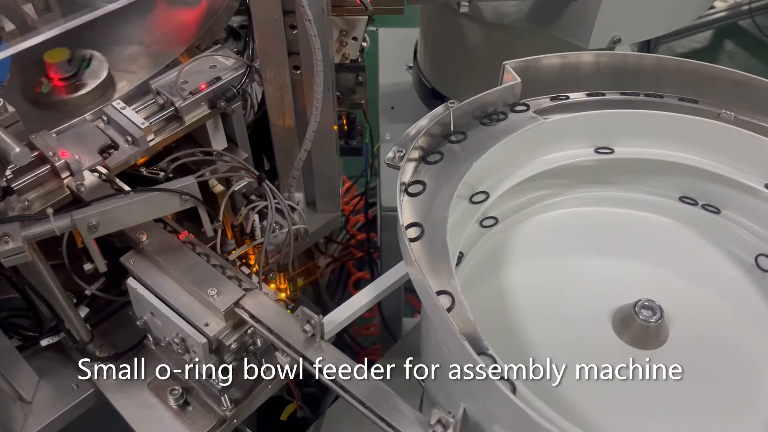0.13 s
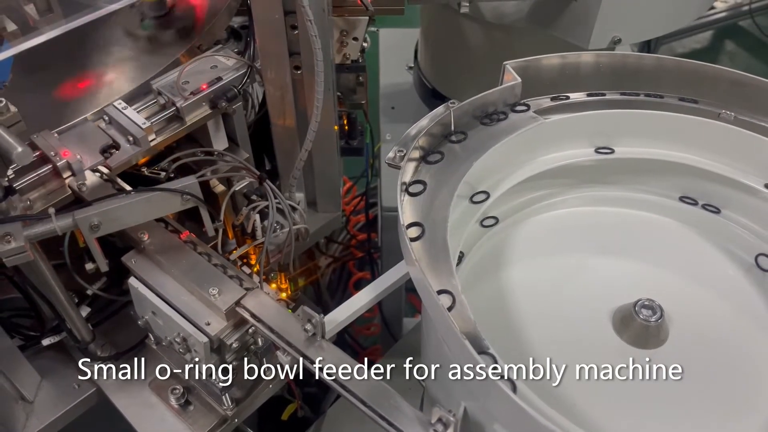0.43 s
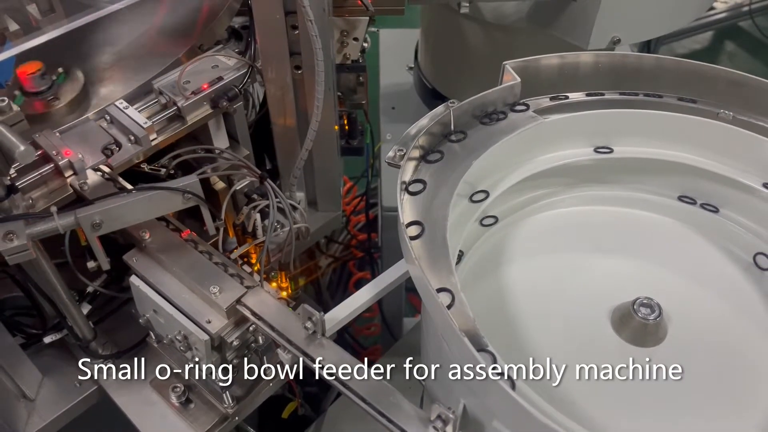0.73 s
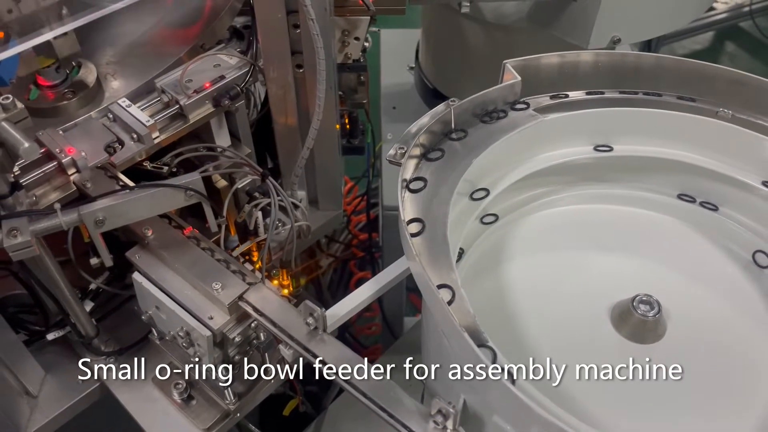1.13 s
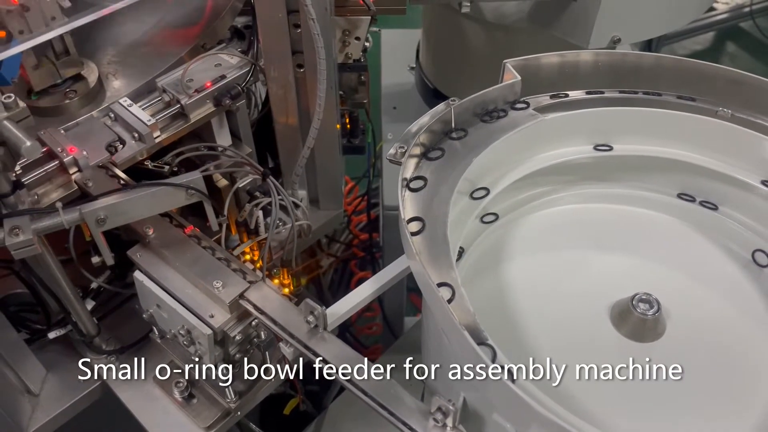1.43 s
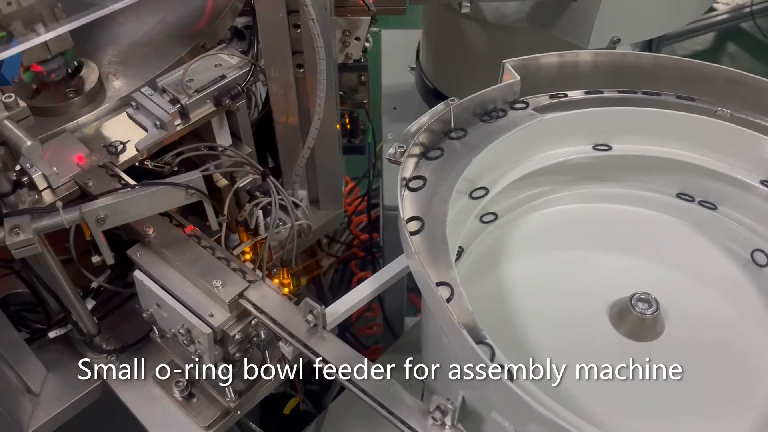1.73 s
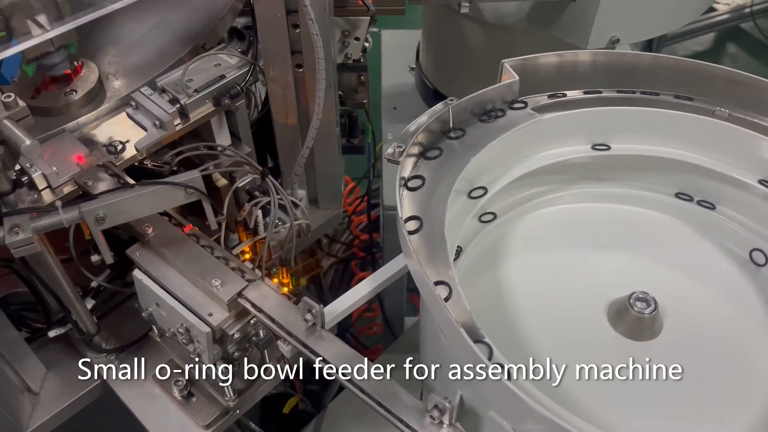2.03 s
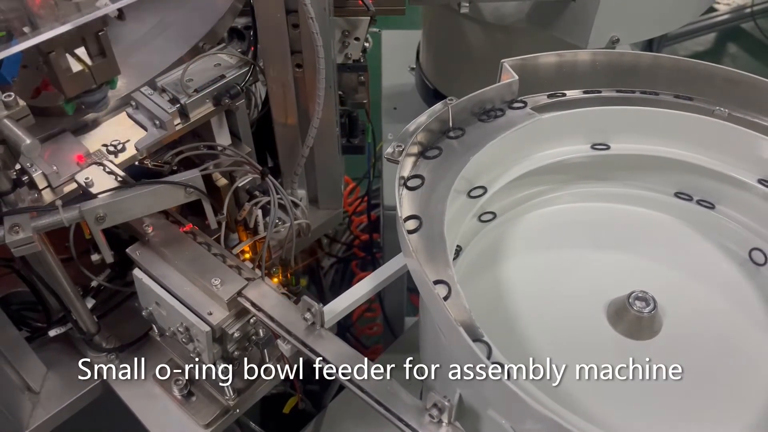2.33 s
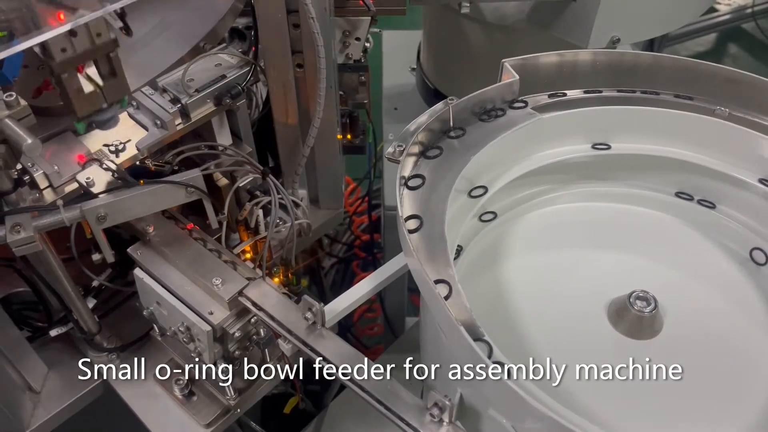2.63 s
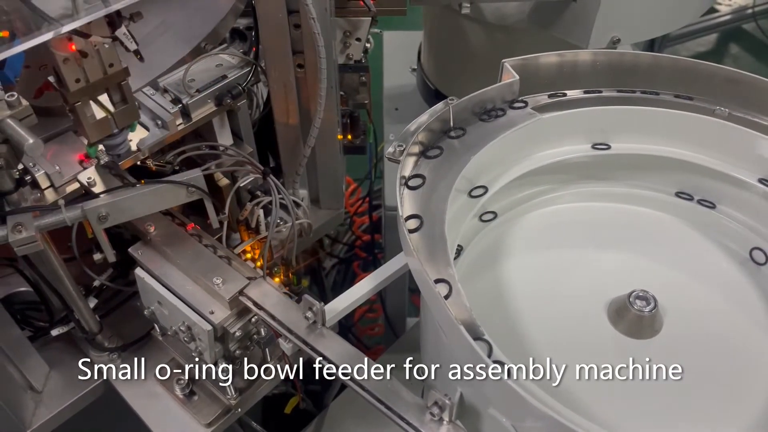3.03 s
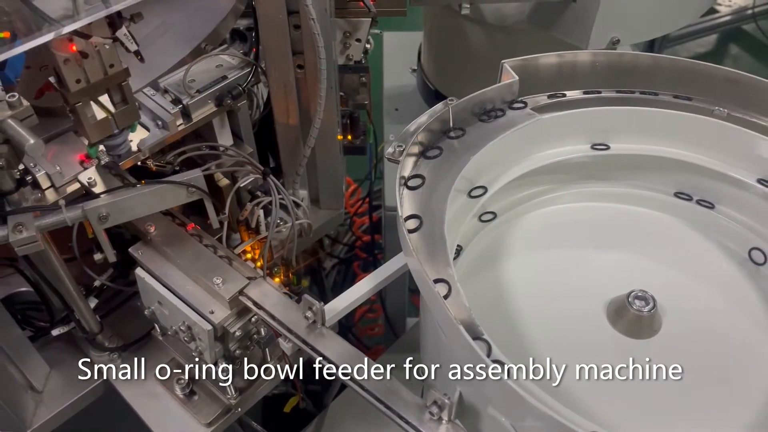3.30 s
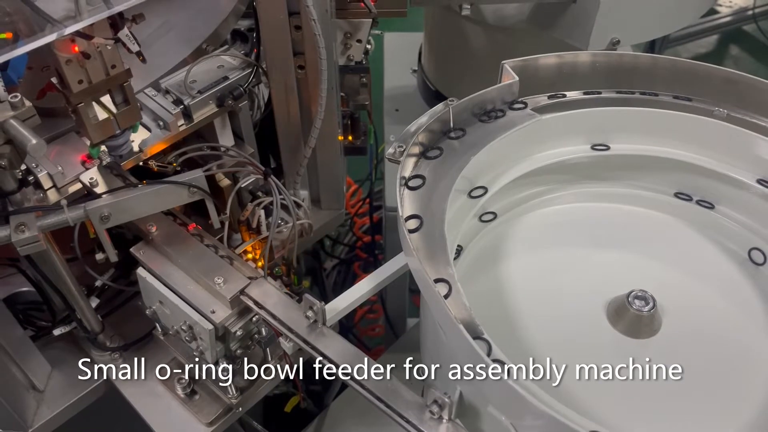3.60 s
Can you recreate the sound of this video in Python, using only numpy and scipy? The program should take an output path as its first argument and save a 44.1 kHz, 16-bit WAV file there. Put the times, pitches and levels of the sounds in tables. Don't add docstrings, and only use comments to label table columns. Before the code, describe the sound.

A loud compressed air blast hisses for two seconds in a factory, after a feeder's hum and rattle and a steel clank; heavy thuds punctuate it, then a softer exhaust hiss. Close stereo microphone.

```python
import sys
import numpy as np
from scipy import signal
from scipy.fft import rfft, irfft, next_fast_len
from scipy.io import wavfile
from scipy.ndimage import uniform_filter1d, map_coordinates

SR = 44100
rng = np.random.default_rng(int(sys.argv[2]) if len(sys.argv) > 2 else 0)


def transcribe(signal):
    frames = np.atleast_2d(signal).T
    limited = np.clip(frames, -1, 1)
    pcm = np.round(limited * 32767).astype(np.int16)
    wavfile.write(sys.argv[1], SR, pcm)


def makeup_ratio(level_db):
    decades = np.asarray(level_db, float) / 20
    return 10 ** decades


N = 165816
T_S = np.arange(N) / SR
STROKE_HZ = 49.3
DIFFUSE = .75

# centre in Hz, width in Hz, gain in dB.
RIM_NOTCH = [(2510, 110, -14)]


def unit(x):
    return x / np.sqrt(np.mean(x ** 2) + 1e-20)


def along(points, hz):
    f, v = np.transpose(points)
    return np.interp(np.log(hz + 1), np.log(f + 1), v)


def curves(rows):
    s, *cols = np.transpose(rows)
    return [np.interp(T_S, s, c) for c in cols]


def wobble(rate_hz):
    return map_coordinates(rng.standard_normal(2000), [T_S * rate_hz])


def filtered(x, response):
    m = next_fast_len(N + 8192)
    return irfft(rfft(x, m) * response(np.fft.rfftfreq(m, 1 / SR)), m)[..., :N]


def rush(spectrum, patchy_db, peaks=(), focus=1):
    # frequency in Hz, correlation.
    alike = [(50, .9), (300, .85), (1050, .2), (1450, .68), (3900, .42), (4900, .72), (6600, .35),
             (10000, .85)]
    z = signal.stft(rng.standard_normal((2, N)), nperseg=512)[2]
    field = uniform_filter1d(rng.standard_normal(z.shape[1:]), size=4, axis=0)
    field = uniform_filter1d(field, size=10, axis=1)
    pair = signal.istft(z * makeup_ratio(patchy_db * unit(field)), nperseg=512)[1][:, :N]

    def response(hz):
        peak_db = sum(db / (1 + (2 * (hz - c) / w) ** 2) for c, w, db in peaks)
        gain = makeup_ratio(along(spectrum, hz) + peak_db)
        locked = .95 / (1 + ((hz - 8100) / 600) ** 4)
        likeness = focus * (1 - (1 - along(alike, hz)) * (1 - locked))
        turn = np.arccos(np.clip(likeness, -1, 1)) / 2
        return gain * [np.cos(turn), np.sin(turn)]

    mid, side = filtered(pair, response)
    return unit(np.array([mid + side, mid - side]))


def echo_ripple():
    count, width_hz, depth_db = 110, 70, 5
    return [(600 + 15000 * u, width_hz * (.5 + v), depth_db * (2 - 4 * w) - 2)
            for u, v, w in rng.random((count, 3))]


def jet():
    # time in seconds, flow in dB.
    flow = [
        (1.277, -66),
        (1.286, -12),
        (1.8, -13),
        (1.9, -16),
        (2.25, -18.5),
        (2.4, -17),
        (2.9, -18),
        (3.33, -18),
        (3.36, -45),
    ]
    # frequency in Hz, level in dB per Hz.
    near = [(800, -16.5), (2300, -8), (3000, -4), (4200, -3), (6300, -6), (8300, -6), (10000, -1),
            (15800, -1)]
    middle = [(800, -26), (2450, -15.5), (2800, -10), (4200, -3.5), (6300, -11), (8300, -7.5), (13000, -2),
              (15800, -5.5)]
    far = [(800, -16), (2000, -8.5), (3000, -6), (4000, -5), (6000, -10.5), (7600, -9.5), (10000, -4),
           (15400, -3)]
    # centre in Hz, width in Hz, dB over the colour.
    cavities = [
        [(1070, 200, -12), (2980, 150, 4), (4424, 110, 9), (4910, 130, 15), (5160, 140, 12.5), (5505, 150, 14),
         (11400, 500, -2)],
        [(3560, 100, 3), (4250, 110, 3), (4590, 80, 4), (4900, 300, 8), (5170, 200, 5), (5510, 180, 3),
         (1120, 200, -10), (5850, 130, -5), (6170, 180, -8), (8260, 570, 10), (11700, 390, -1)],
        [(600, 150, -16), (950, 200, 7), (3620, 160, 5.5), (4590, 154, 10.5), (5300, 190, 10), (8500, 620, 0),
         (12600, 690, 3)],
    ]
    # centre in Hz, width in Hz, gain in dB.
    shadows = [(6100, 210, -1), (7100, 210, -4.5)]
    first_move_s, second_move_s, move_s = 1.875, 2.85, .1

    db, = curves(flow)
    first = np.clip((T_S - first_move_s) / move_s + .5, 0, 1)
    second = np.clip((T_S - second_move_s) / move_s + .5, 0, 1)
    shares = np.sqrt(np.abs([1 - first, first - second, second]))
    air = 0
    for share, colour, cavity in zip(shares, (near, middle, far), cavities):
        noise = rush(colour, patchy_db=1.5, peaks=cavity + shadows + echo_ripple())
        air = air + share * makeup_ratio(0.65 * wobble(30.1)) * noise
    return makeup_ratio(db + .4 * wobble(7)) * air


def thuds():
    # start in seconds, peak in dB, pitch in Hz, ring t60 in seconds, rumble in dB.
    stops = [(0.666, -17.5, 447, 0.11, -11), (1.066, -4.5, 93, 0.067, -23.5), (1.28, -7.5, 261, 0.1, -13.5),
             (1.306, -20.5, 295, 0.12, -3.5), (1.357, -15.5, 189.6, 0.45, -6.5),
             (1.433, -20, 231, 0.13, -5), (1.562, -21.5, 108, 0.19, -8), (1.669, -26.5, 148, .15, -1.5),
             (1.831, -13.5, 392, 0.087, -12), (1.912, -16, 165, 0.41, -6), (1.998, -24, 197, 0.22, -6.5),
             (2.309, -9, 266, 0.28, -13.5), (2.366, -11, 267, 0.085, -16.5), (2.419, -19.5, 299, 0.15, -2),
             (2.5, -17, 248, 0.23, -9.5), (2.564, -30.5, 217, 0.097, -2.5),
             (2.871, -12.5, 335, 0.13, -13.5), (2.96, -24.5, 240, 0.14, -1.5),
             (3.059, -26, 175, 0.089, -11), (3.098, -25, 157.7, .15, -12), (3.19, -36, 148, 0.12, -21),
             (3.256, -18.5, 165.5, 0.24, -4.5), (3.306, -20.5, 323, 0.13, -7), (3.387, -21, 258, 0.14, -15)]
    # frequency in Hz, level in dB per Hz.
    frame = [(40, -120), (100, -1), (260, -3.5), (420, -4.5), (560, -11.5), (1100, -16), (2500, -26),
             (4000, -120)]
    upper_ratio, upper_db, push_s = 1.5, -11, .003
    crack_db, crack_t60_s, rumble_t60_s, rumble_rise_s = -18, .035, .29, .0013

    ring, power, t = np.zeros(N + SR), np.zeros(N + SR), np.arange(SR // 2) / SR
    for s, db, hz, t60_s, rumble_db in stops:
        modes = np.sin(2 * np.pi * hz * t) - makeup_ratio(upper_db) * np.sin(2 * np.pi * hz * upper_ratio * t)
        modes = modes * makeup_ratio(-60 * t / t60_s) * (1 - np.exp(-t / push_s)) ** 2
        crack = uniform_filter1d(rng.standard_normal(len(t)), size=14)
        crack = crack - uniform_filter1d(crack, size=90)
        crack = crack * makeup_ratio(crack_db - 60 * t / crack_t60_s)
        ring[round(s * SR):][:len(t)] += makeup_ratio(db) * .5 * (modes + crack)
        decay = makeup_ratio(db + rumble_db - 60 * t / rumble_t60_s) ** 2
        power[round(s * SR):][:len(t)] += decay * (1 - np.exp(-t / rumble_rise_s))
    level = np.sqrt(np.abs(power[:N])) * makeup_ratio(1.2 * wobble(45))
    return ring[:N], level * rush(frame, patchy_db=1.2)


def strike(s, db, modes, crack_db, rise_s, crack_t60_s, gather_s, size):
    out, t = np.zeros(N), np.arange(SR // 2) / SR
    ring = sum(makeup_ratio(level - 60 * t / t60_s) * np.cos(2 * np.pi * hz * (t - gather_s))
               for hz, level, t60_s in modes)
    ring = ring * (1 - np.exp(-t / rise_s))
    crack = uniform_filter1d(rng.standard_normal(len(t)), size=size)
    crack = crack * makeup_ratio(crack_db - 60 * t / crack_t60_s)
    out[round(s * SR):][:len(t)] += makeup_ratio(db) * (ring + crack)
    return out


def slam():
    # frequency in Hz, level in dB, t60 in seconds.
    modes = [(268, -3.5, .11), (335, -8.5, .085), (404, -8, .085), (262, -22, .7), (540, -21, .25),
             (754, -20, .06), (1050, -20, .03), (1700, -17, .015)]
    return strike(2.2765, -2.2, modes, crack_db=-5, rise_s=.003, crack_t60_s=.035, gather_s=.0054, size=12)


def clank():
    # frequency in Hz, level in dB, t60 in seconds.
    modes = [(486, -8, 0.085), (901, -0.5, 0.12), (995, 5.5, 0.051), (1770, 0.5, .06), (2470, -14, 0.023),
             (4151, -27, 0.018), (4700, -7, 0.029), (5530, -4, 0.03)]
    return strike(.638, -15.5, modes, crack_db=5, rise_s=.0005, crack_t60_s=.049, gather_s=.002, size=4)


def feeder():
    # time in seconds, pitch in Hz, level in dB.
    hum_path = [
        (0, 94.9, -17),
        (.2, 98, -19.5),
        (.42, 96.6, -17.5),
        (.55, 98, -25),
        (.7, 96, -31.5),
        (.95, 96.6, -42.5),
        (1.3, 98.5, -48),
    ]
    # multiple of the stroke, level in dB.
    buzz_partials = [(1, -41), (2, -36), (3, -39), (4, -39), (5, -43), (16, -45)]
    octave_db, left_db, restart_s, rise_s = -19, 3.5, 3.497, .03

    hz, db = curves(hum_path)
    turn = 2 * np.pi * np.cumsum(hz) / SR
    hum = np.sin(turn) + makeup_ratio(octave_db) * np.cos(2 * turn)
    hum = np.sqrt(2) * makeup_ratio(db + 0.57 * wobble(6.2)) * hum
    since_s = T_S - restart_s
    buzz = sum(makeup_ratio(level + 2.7 * wobble(34)) * np.cos(2 * np.pi * k * STROKE_HZ * since_s)
               for k, level in buzz_partials)
    buzz = np.sqrt(2) * buzz * np.clip(since_s / rise_s, 0, 1)
    return hum * makeup_ratio([[left_db], [-left_db]]) + buzz


def track():
    # time in seconds, level in dB.
    rattle = [
        (0, -37.5),
        (.1, -30.5),
        (.7, -32.5),
        (.83, -33),
        (1.03, -34),
        (1.08, -31.5),
        (1.14, -30.5),
        (1.16, -40),
        (1.3, -58),
    ]
    # frequency in Hz, width in Hz, level in dB.
    body_modes = [(251, 68, -2), (408, 55, -3.5), (764, 55, -3), (1505, 110, -10), (1826, 100, 3),
                  (2116, 48, -9), (2313, 51, -7.5), (2853, 104, -12), (5440, 120, -12.5)]
    # frequency in Hz, level in dB per Hz.
    hiss_colour = [(400, -120), (800, -5), (2000, 0), (5500, -17), (7000, -3.5), (15500, -20),
                   (16200, -120)]
    tap_hz, first_s, scatter_db, hiss_db, gate_depth = 41.33, .0095, -0.2, -7.5, 1.4

    def body(f):
        return sum(makeup_ratio(level) * (1j * f * w / (c * c - f * f + 1j * f * w)) ** 2
                   for c, w, level in body_modes)

    db, = curves(rattle)
    cycles = (T_S - first_s) * tap_hz
    taps = (np.diff(np.floor(cycles), prepend=0) > 0) * makeup_ratio(scatter_db * wobble(40.9))
    gate = np.exp(gate_depth * np.cos(2 * np.pi * (cycles - .2)))
    hiss = gate * rush(hiss_colour, patchy_db=-1.0, peaks=RIM_NOTCH, focus=DIFFUSE)
    return makeup_ratio(db) * (unit(filtered(taps, body)) + makeup_ratio(hiss_db) * unit(hiss))


def exhaust():
    # time in seconds, level in dB.
    swell = [
        (3.25, -63),
        (3.36, -31.5),
        (3.45, -27),
        (3.6, -26.5),
        (3.76, -26),
    ]
    # frequency in Hz, level in dB per Hz.
    colour = [(300, -22), (700, -1), (1600, -1), (3000, -2.5), (4500, -5.5), (6500, -17), (10000, -23),
              (15500, -36)]
    db, = curves(swell)
    shake_db = 0.48 * np.cos(2 * np.pi * STROKE_HZ * T_S)
    peaks = [(780, 15, 9.8), (1170, 46, 6.5), (1770, 420, 2.5)]  # Hz, width Hz, dB
    hiss = rush(colour, patchy_db=-0.8, peaks=peaks, focus=DIFFUSE)
    return makeup_ratio(db + shake_db + 0.57 * wobble(20)) * hiss


def room(x):
    t60_s = .22
    t = np.arange(SR // 2) / SR
    tail = uniform_filter1d(rng.standard_normal((2, len(t))), size=5, axis=1) * makeup_ratio(-60 * t / t60_s)
    late = np.pad(x, (500, 0))[None]
    return signal.fftconvolve(late, tail / np.linalg.norm(tail[0]), axes=1)[:, :N]


def hall():
    # frequency in Hz, level in dB per Hz.
    rumble_colour = [(25, -32), (55, 7), (110, -1), (260, -1.5), (450, -9.5), (700, -15.5), (1500, -30)]
    # time in seconds, level in dB.
    hiss_level = [(0, -27.5), (.45, -30), (.8, -31.5), (1.04, -32), (1.07, -27.5), (1.15, -28.5),
                  (1.19, -33.5), (2.1, -38.5), (2.8, -38.5), (3.1, -34.5), (3.76, -38)]
    # frequency in Hz, level in dB per Hz.
    hiss_colour = [(300, 11), (600, 3.5), (1500, 10), (2500, 3), (4500, 2), (5400, 2.5), (7000, -1),
                   (15500, 0.5)]
    db, = curves(hiss_level)
    rumble = makeup_ratio(-35 + 1.5 * wobble(9)) * rush(rumble_colour, patchy_db=2.5)
    return rumble + makeup_ratio(db) * rush(hiss_colour, patchy_db=1.2, peaks=RIM_NOTCH, focus=DIFFUSE)


def scene():
    room_db, clank_wet_db = -12, -6
    ring, rumble = thuds()
    stop = clank()
    hits = ring + slam()
    walls = makeup_ratio(room_db) * room(hits + makeup_ratio(clank_wet_db) * stop)
    return jet() + hits + stop + rumble + feeder() + track() + exhaust() + walls + hall()


def roll_off(x):
    return signal.sosfilt(signal.butter(12, 16050, fs=SR, output="sos"), x)


def record(dry):
    # centre in Hz, width in Hz, left in dB, right in dB.
    housing = [(1070, 103, -0.5, -5), (1083, 275, 0, 2), (1523, 430, -1, 8.5), (1800, 360, -1, -3),
               (2497, 70, -4, 7)]
    # frequency in Hz, left over right in dB.
    left_over_right = [(50, 1.5), (400, 3.5), (800, 6), (1500, 6), (3000, 3.5), (6000, 4.5), (9000, 2),
                       (15000, -1.8)]
    # frequency in Hz, radians the left leads.
    left_lead = [(0, 0), (700, 1.4), (1250, 3.1), (1620, 4), (1800, 6.7), (2600, 6.3), (3500, 8.2),
                 (4200, 6.7), (4800, 7.1), (5600, 6.2), (7750, 3.14), (8500, 3.14), (11400, 0), (14900, -2),
                 (15400, -3.14), (16000, -3.14)]
    bottom_hz, top_hz, ceiling = 38, 15900, .93

    def ports(hz):
        half = np.array([[.5], [-.5]])
        housing_db = sum(np.array([[left], [right]]) / (1 + (2 * (hz - c) / w) ** 2)
                         for c, w, left, right in housing)
        gain = makeup_ratio(housing_db + half * along(left_over_right, hz))
        phase = half * np.interp(hz, *np.transpose(left_lead))
        band = (hz < top_hz) * hz ** 2 / (hz ** 2 + bottom_hz ** 2)
        return gain * np.exp(1j * phase) * band

    return roll_off(np.clip(filtered(dry, ports), -ceiling, ceiling))


dry = scene()
out = record(dry)
transcribe(out)
```